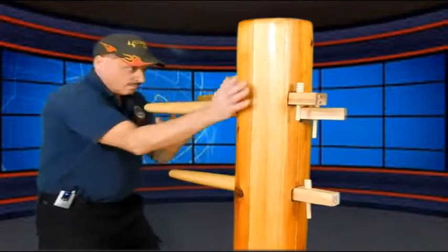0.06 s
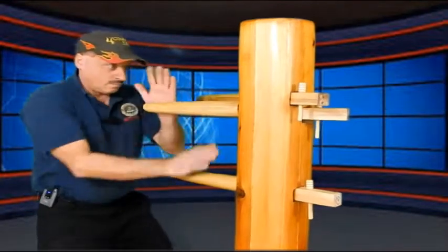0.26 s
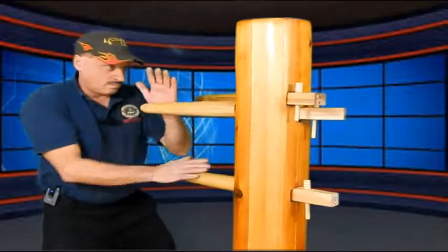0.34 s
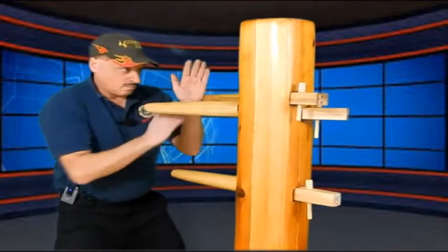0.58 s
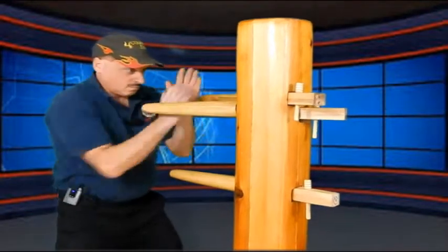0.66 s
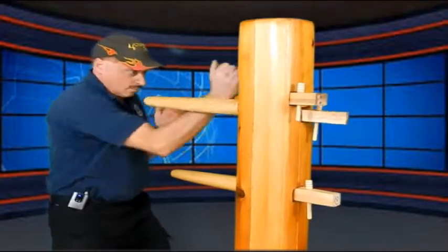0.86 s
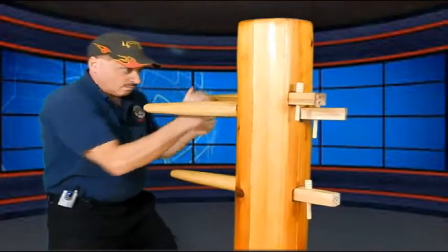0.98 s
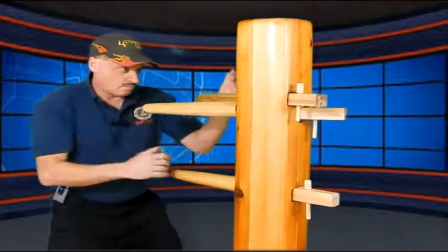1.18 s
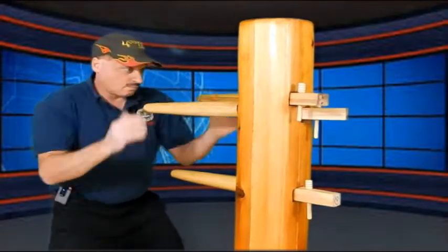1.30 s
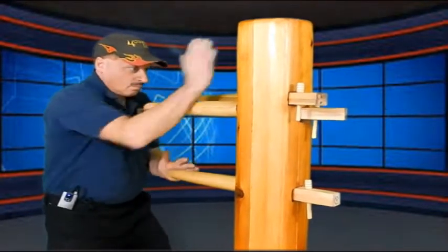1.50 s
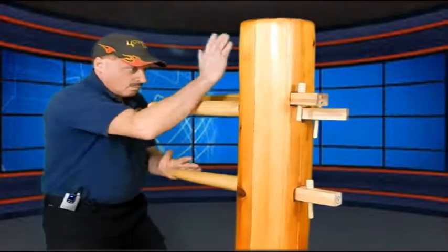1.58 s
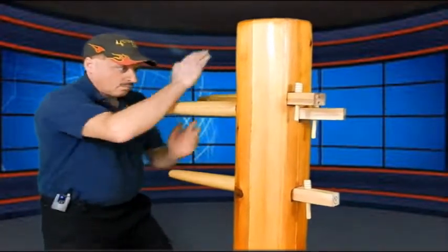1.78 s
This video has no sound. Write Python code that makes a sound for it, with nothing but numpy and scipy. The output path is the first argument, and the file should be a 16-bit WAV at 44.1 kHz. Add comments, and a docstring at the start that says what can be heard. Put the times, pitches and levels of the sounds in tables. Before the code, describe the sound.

Hollow wooden knocks from a struck training dummy come in uneven clusters, loudest early, with loose arms rattling, low frame thumps and sleeve swishes between; close microphone, short lively room echo, faint low rumble.

```python
"""A low room rumble and a sleeve swish open the scene; a light wooden tap and then the first blow follow at once.
Hands and forearms strike a wooden training dummy in a small, live room.
Each blow mixes damped sines and noise: the trunk rings, an arm clacks in its socket, skin slaps, the frame thumps.
Loose arms rattle as short noise taps, soft footsteps thump between blows, and sleeves swish as swelling noise.
The hardest hits overload the microphone, which flattens their peaks."""
import sys
import numpy as np
from scipy import signal
from scipy.fft import rfft, irfft, next_fast_len
from scipy.io import wavfile
from scipy.ndimage import map_coordinates

SR = 44100
rng = np.random.default_rng(int(sys.argv[2]) if len(sys.argv) > 2 else 0)


def generate_wav(sig):
    """Save sig (samples, or channels by samples) to the path in sys.argv[1] as 16-bit PCM at SR."""
    pcm = np.round(np.clip(np.atleast_2d(sig).T, -1, 1) * 32767).astype(np.int16)
    wavfile.write(sys.argv[1], SR, pcm)


N = 81585

# Uneven low rumble of the room: (frequency [Hz], relative level [dB])
RUMBLE_SPECTRUM = [(20, -3.5), (50, 1), (65, -3.5), (95, 3), (120, -0.5), (145, -3), (190, -10.5),
                   (400, -18), (800, -25), (2000, -26), (5000, -45), (11000, -51.5), (16000, -57)]
# Soft footsteps between blows: (time [s], level [dB])
FOOTSTEP_THUDS = [(.376, -25.5), (.48, -33), (1.635, -31.5)]
# Sleeve and skin sliding: (time of the peak [s], rise [s], fall [s], level [dB])
SLEEVE_SWISHES = [(.04, .05, 0.11, -32), (.57, 0.18, 0.092, -38.5), (.82, 0.15, 0.16, -32),
                  (1.126, 0.015, 0.039, -30), (1.23, 0.11, 0.19, -36), (1.35, 0.01, 0.05, -33),
                  (1.453, 0.011, 0.12, -25), (1.65, 0.025, 0.2, -39.5), (1.827, 0.01, 0.23, -23)]
# Tone of the sliding cloth: (frequency [Hz], relative level [dB])
CLOTH_SPECTRUM = [(150, 15), (600, 14), (2000, 7), (4000, 1.5), (6000, -1), (7500, -2), (11000, 2),
                  (14000, -4.5), (16000, -18)]
# Loose arms tapping in their sockets: (time [s], level [dB])
ARM_RATTLES = [(.004, -38.5), (.05, -34.5), (.378, -36.5), (0.463, -37), (0.851, -28), (.93, -35),
               (1.346, -30.5), (1.64, -28.5), (1.817, -33), (1.837, -35)]
# Tone of these light taps: (frequency [Hz], relative level [dB])
TAP_SPECTRUM = [(150, -25), (500, 3), (850, -0.5), (1500, -2), (2500, -7.5), (3800, -5.5), (6000, -17),
                (15000, -25.5)]
# Blows on the dummy: (time [s], wood level [dB], contact brightness [Hz], hollow trunk level [dB],
# arm pitch [Hz], arm level [dB], arm overtone pitch [Hz], arm overtone level [dB],
# time for the arm echoes to fall 60 dB [s], skin slap level [dB], frame thump level [dB])
DUMMY_BLOWS = [(.028, -32.5, 1810, -41, 254, -24.5, 1040, -37, 0.15, -64, -26),
               (.175, -43, 400, -27, 285, -25, 660, -29, 0.19, -76, -31),
               (0.228, -3.5, 1270, -3.5, 688, 3.5, 2037, -0.5, 0.13, -21.5, -13.5),
               (.269, -18, 1210, -5, 840, -4.5, 1185, -0.5, 0.34, -36, -23.5),
               (0.566, -53, 439, -31, 284, -17.5, 695, -56, 0.15, -77, -27.5),
               (0.605, -56, 680, -27.5, 226, -13.5, 650, -27, 0.35, -77, -40),
               (0.7129, -19, 960, -11, 786, 0, 1883, -20.5, 0.16, -39.5, -16.5),
               (.724, -24.5, 790, -20, 564, -5.5, 950, -12, 0.38, -41, -19),
               (.914, -26, 845, -14, 262, -31, 700, -24, 0.54, -57, -19),
               (1.136, -17.5, 2600, 0.5, 798, 5.5, 1568, -7.5, 0.35, -57, -18),
               (1.458, -19.5, 690, -1.5, 315, -5.5, 890, -25.5, 0.16, -55, -16),
               (1.482, -36, 496, -4, 366, -7.5, 890, -16, 0.19, -61, -20.5),
               (1.521, -14, 2550, -3.5, 800, 2, 2270, -10, .24, -22.5, -17),
               (1.544, -32, 2250, -2, 810, -4, 1753, -11.5, 0.24, -44, -23.5),
               (1.685, -26.5, 500, -16.5, 490, -43, 634, -16.5, 0.26, -66, -30.5)]
# Ringing tones of trunk and arms: (frequency [Hz], relative level [dB], time to fall 60 dB [s])
WOOD_MODES = [(415, -10, 0.72), (476.3, -4.5, 0.31), (517, 0.5, 0.26), (598.4, -1.5, 0.38), (764, -24, .3),
              (765.3, 0.5, 0.12), (887, -2.5, 0.3), (946, -8.5, 0.31), (1046, -1, 0.12), (1204, -2, 0.24),
              (1391, -9.5, 0.37), (1556, -17.5, 0.36), (2355, -16, .3), (2434, -19, 0.35)]
# Dense wash of sound between those tones: (frequency [Hz], relative level [dB])
GRAIN_SPECTRUM = [(60, -10), (220, -29), (310, -71), (420, -7), (650, -1.5), (850, -5.5), (1280, -3.5),
                  (1500, -11), (2300, -9), (2800, -9.5), (6000, -24.5), (15000, -50)]
# Bare wood meeting wood: (frequency [Hz], relative level [dB])
CRACK_SPECTRUM = [(400, -10), (1000, -6), (2200, 0.5), (3500, 0), (5500, -6), (9000, -18), (15000, -26)]
# Slapping skin: (frequency [Hz], relative level [dB])
SKIN_SPECTRUM = [(200, 0), (1000, -63), (2200, -17.5), (4000, 3), (6000, -4.5), (11000, 0), (14000, -7),
                 (16000, -57)]
# Deep boom of a thump in the room: (frequency [Hz], relative level [dB])
BOOM_SPECTRUM = [(20, -58), (45, -21), (65, 5), (100, 5.5), (145, 4.5), (200, 0), (400, 2), (1500, -80)]
# Low ringing tones of a thump: (frequency [Hz], relative level [dB], time to fall 60 dB [s])
FRAME_MODES = [(59.7, -8.5, 0.53), (97.5, -3.5, 0.34), (143.16, -5, .4)]
# How long the room holds each pitch: (frequency [Hz], time to fall 60 dB [s])
ROOM_DECAY = [(80, 0.62), (250, 0.15), (600, 0.38), (1500, 0.4), (4000, 0.35), (12000, 0.41)]
# How alike left and right are: (frequency [Hz], likeness [0 to 1])
STEREO_LIKENESS = [(100, 0.96), (450, 0.92), (1000, 0.83), (2000, 0.42), (4000, 0.14), (10000, 0.2)]

# Names in _DB are levels [dB], _HZ frequencies [Hz], _S times [s]; a T60 is the time to fall 60 dB.
RUMBLE_DB, SWAY_DB, SWAY_PER_S = -34, -0.5, 13.64  # SWAY_PER_S: random points per second
RUSTLE_DB, RUSTLE_PER_S = 1.5, 380  # RUSTLE_PER_S: random points per second
TAP_DB, TAP_T60_S = 4, 0.023
WOOD_RISE_S, MODES_DB, GRAIN_DB = 0.001, -4.5, -0.5
CONTACT_SLOPE = 1.51  # how steeply the treble falls away
CONTACT_CYCLES = 3.23  # contact time in cycles of the contact brightness: softer blows swell more slowly
HOLLOW_HZ, HOLLOW_T60_S, HOLLOW_ROOM_DB, HOLLOW_ECHO_T60_S = 426.6, 0.043, -12, 0.23
ARM_T60_S, ARM_ROOM_DB = 0.049, -14.5
OVERTONE_T60_S, OVERTONE_ROOM_DB = 0.03, -11
ECHO_RISE_S, ECHO_WIDTH_HZ, ECHO_WIDTH_SHARE = 0.0021, 91, 0.03  # the echoes' band widens with pitch
CRACK_DB, CRACK_T60_S, CRACK_RISE_S = -13.5, 0.04, 0.0027
SLAP_RISE_S = 0.00078
THUMP_RISE_S, THUMP_DELAY_S, FRAME_DB = 0.0089, 0.00356, 0
BALANCE_DB = -0.44  # on the left; the right gets the opposite
FULL_SCALE, OVERLOAD_KNEE = 1.0, 24  # a higher knee bends more sharply
TOP_HZ = 15700


def amp(db):
    """Turn decibels into a gain."""
    return 10 ** (np.asarray(db) / 20)


def along(points, hz):
    """Read a value between (frequency, value) points, spacing pitch as the ear does, on a log scale."""
    f, v = np.transpose(points)
    return np.interp(np.log(hz + 1), np.log(f + 1), v)


def clock():
    """Seconds at each sample."""
    return np.arange(N) / SR


def fade(t60):
    """Die away smoothly, losing 60 dB in t60 seconds."""
    return np.exp(-np.log(1000) * clock() / t60)


def rise(seconds):
    """Start softly, as energy builds up."""
    return 1 - np.exp(-clock() / seconds)


def wobble(rate):
    """A smooth random curve through `rate` random points a second."""
    return map_coordinates(rng.standard_normal(N), [clock() * rate])


def add(out, s, sound):
    """Mix a sound in from time s."""
    i = max(0, round(s * SR))
    out[:, i:] += sound[..., :N - i]


def filtered(x, response):
    """Change the level of each frequency in x by the given response."""
    m = next_fast_len(N + SR // 4)
    hz = np.fft.rfftfreq(m, 1 / SR)
    return irfft(rfft(x, m) * response(hz), m)[..., :N]


def noise(spectrum):
    """Stereo noise of rms 1, near mono in the bass and wide in the treble."""
    def mid_side_response(hz):
        turn = np.arccos(np.clip(along(STEREO_LIKENESS, hz), -1, 1)) / 2
        return amp(along(spectrum, hz)) * [np.cos(turn), np.sin(turn)]

    mid, side = filtered(rng.standard_normal((2, N)), mid_side_response)
    pair = np.array([mid + side, mid - side])
    return pair / pair.std()


def dying(x):
    """Each frequency of x dies away as the room lets it."""
    hz, t, z = signal.stft(x, SR, nperseg=256)
    z = z * amp(-60 * t / along(ROOM_DECAY, hz)[:, None])
    return signal.istft(z, SR, nperseg=256)[1][:, :N]


def ring(modes, colour):
    """Damped sines of alternating sign, each struck a little differently every time."""
    total = 0
    for k, (hz, db, t60) in enumerate(modes):
        level = amp(db + rng.normal(0, 0.4)) * colour(hz)
        total = total + (-1) ** k * level * np.sin(2 * np.pi * hz * clock()) * fade(t60)
    return total


def low_end():
    """Soft footsteps thump between the blows over an uneven room rumble made of low noise."""
    out = amp(RUMBLE_DB + SWAY_DB * wobble(SWAY_PER_S)) * noise(RUMBLE_SPECTRUM)
    for s, db in FOOTSTEP_THUDS:
        add(out, s, amp(db) * thump())
    return out


def sleeves():
    """Cloth and skin brush along the arms: noise that swells and fades with each move."""
    t = clock()
    power = 0
    for s, up, down, db in SLEEVE_SWISHES:
        distance = np.maximum((s - t) / up, (t - s) / down)
        power = power + amp(db) ** 2 * np.exp(-2 * distance)
    rustle = amp(RUSTLE_DB * wobble(RUSTLE_PER_S))
    return np.sqrt(power) * rustle * noise(CLOTH_SPECTRUM)


def rattles():
    """Light wood-on-wood taps of short noise, each with its tail in the room."""
    out = np.zeros((2, N))
    for s, db in ARM_RATTLES:
        tap = amp(TAP_DB) * noise(TAP_SPECTRUM) * fade(TAP_T60_S)
        tail = dying(noise(TAP_SPECTRUM))
        add(out, s, amp(db) * (tap + tail))
    return out


def soften(contact_hz):
    """Soft flesh takes away the treble above the contact brightness."""
    return lambda hz: 1 / np.sqrt(1 + (hz / contact_hz) ** (2 * CONTACT_SLOPE))


def knock(contact_hz):
    """The wood rings in its own tones and in a dense wash between them."""
    soft = soften(contact_hz)
    tones = amp(MODES_DB) * ring(WOOD_MODES, soft)
    wash = amp(GRAIN_DB) * dying(filtered(noise(GRAIN_SPECTRUM), soft))
    return rise(WOOD_RISE_S) * (tones + wash)


def clack(hz, t60, room_db, echo_t60, contact_s):
    """One short hollow tone of the wood and its rough, dense echoes from the walls."""
    tone = np.sin(2 * np.pi * hz * clock()) * rise(contact_s) * fade(t60)
    width = ECHO_WIDTH_HZ + ECHO_WIDTH_SHARE * hz
    band = filtered(noise([(hz, 0)]), lambda f: np.exp(-.5 * ((f - hz) / width) ** 2))
    swell = fade(echo_t60) * rise(ECHO_RISE_S)
    echo = band * swell
    # give the echo the same overall strength as its swell
    echo_gain = np.sqrt(np.mean(swell ** 2) / np.mean(echo ** 2))
    return tone + amp(room_db) * echo * echo_gain


def crack(contact_hz):
    """The dry snap of an arm against its socket, a short burst of softened noise."""
    snap = filtered(noise(CRACK_SPECTRUM), soften(contact_hz))
    return amp(CRACK_DB) * snap * rise(CRACK_RISE_S) * fade(CRACK_T60_S)


def slap():
    """Skin meets wood: a sudden burst of noise that dies away in the room."""
    return rise(SLAP_RISE_S) * dying(noise(SKIN_SPECTRUM))


def thump():
    """A low ring and a boom in the room, from a blow shaking the frame or from a footstep."""
    boom = dying(noise(BOOM_SPECTRUM))
    low_ring = amp(FRAME_DB) * ring(FRAME_MODES, lambda hz: 1)
    return rise(THUMP_RISE_S) * (boom + low_ring)


def blows():
    """Every blow knocks the trunk, clacks an arm in its socket, slaps skin and thumps the frame."""
    out = np.zeros((2, N))
    for (s, wood_db, contact_hz, hollow_db, arm_hz, arm_db,
         overtone_hz, overtone_db, echo_t60, slap_db, thump_db) in DUMMY_BLOWS:
        contact_s = CONTACT_CYCLES / contact_hz
        wood = amp(wood_db) * knock(contact_hz)
        hollow = clack(HOLLOW_HZ, HOLLOW_T60_S, HOLLOW_ROOM_DB, HOLLOW_ECHO_T60_S, contact_s)
        arm = clack(arm_hz, ARM_T60_S, ARM_ROOM_DB, echo_t60, contact_s) + crack(contact_hz)
        overtone = clack(overtone_hz, OVERTONE_T60_S, OVERTONE_ROOM_DB, echo_t60, contact_s)
        clacks = amp(hollow_db) * hollow + amp(arm_db) * arm + amp(overtone_db) * overtone
        add(out, s, wood + clacks + amp(slap_db) * slap())
        add(out, s + THUMP_DELAY_S, amp(thump_db) * thump())
    return out


def scene():
    """The room's rumble, the footsteps, the sleeves and the dummy together, slightly to the right."""
    balance = amp([[BALANCE_DB], [-BALANCE_DB]])
    return (low_end() + sleeves() + rattles() + blows()) * balance


def record(dry):
    """The recorder flattens the highest peaks and keeps nothing above its band limit."""
    clipped = dry / (1 + np.abs(dry / FULL_SCALE) ** OVERLOAD_KNEE) ** (1 / OVERLOAD_KNEE)
    return filtered(clipped, lambda hz: hz < TOP_HZ)


dry = scene()
out = record(dry)
generate_wav(out)
```